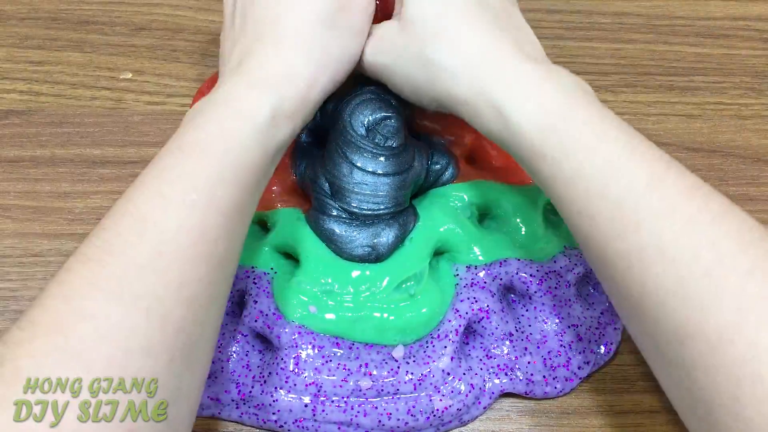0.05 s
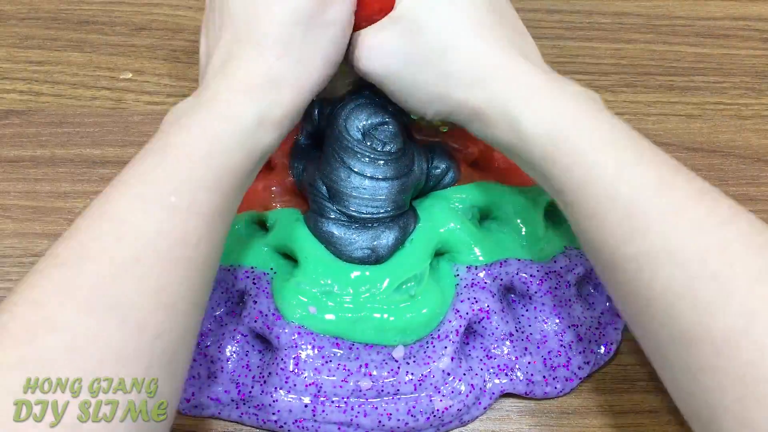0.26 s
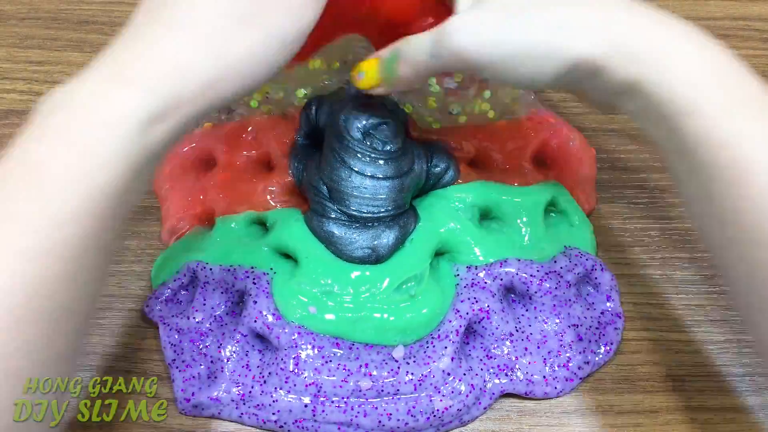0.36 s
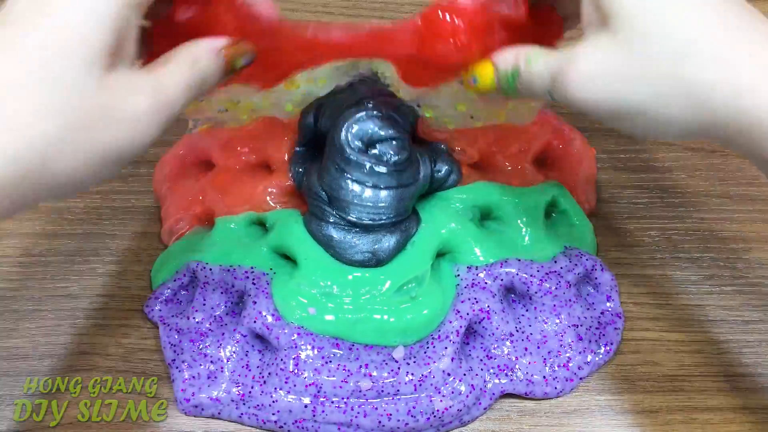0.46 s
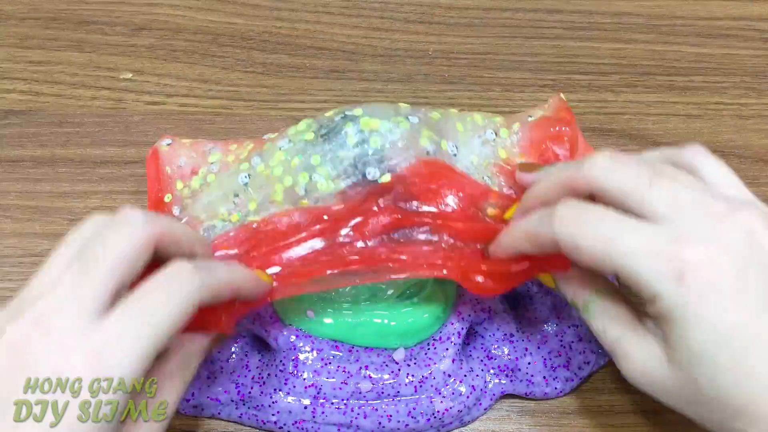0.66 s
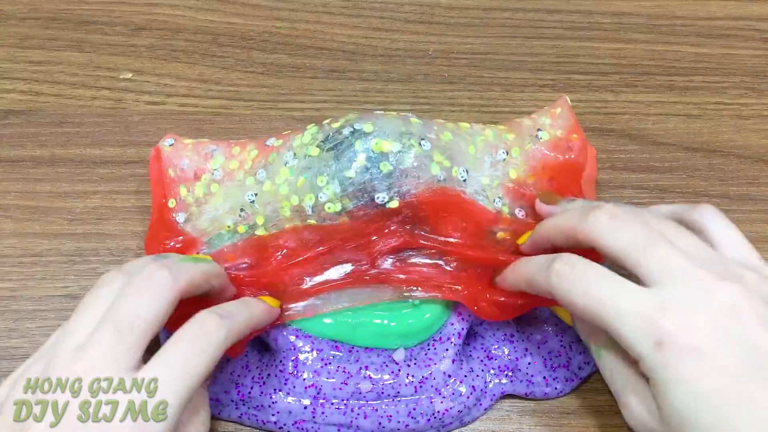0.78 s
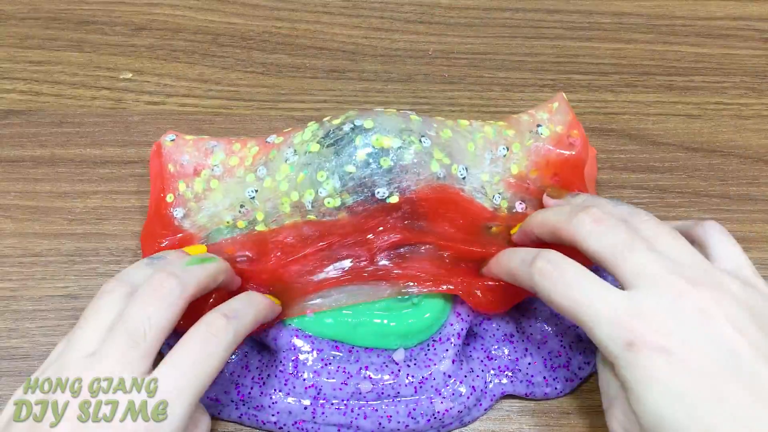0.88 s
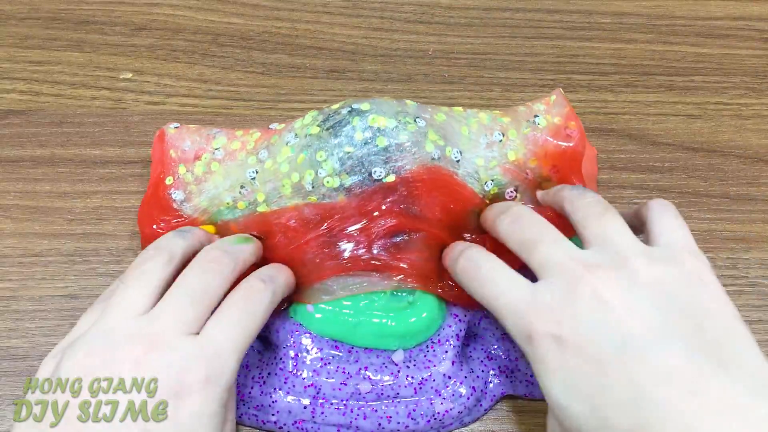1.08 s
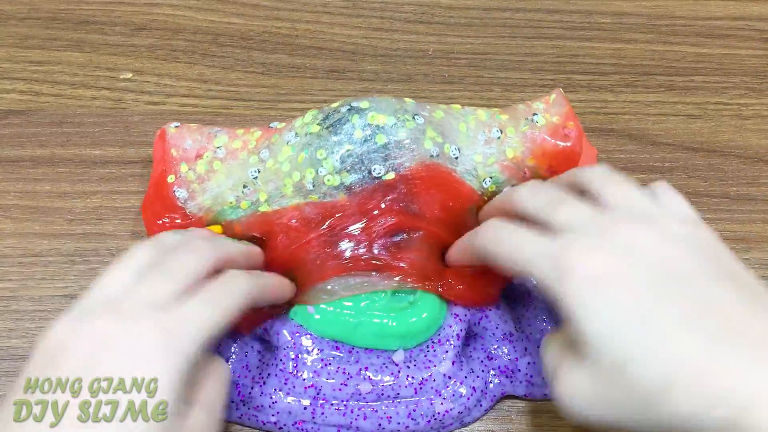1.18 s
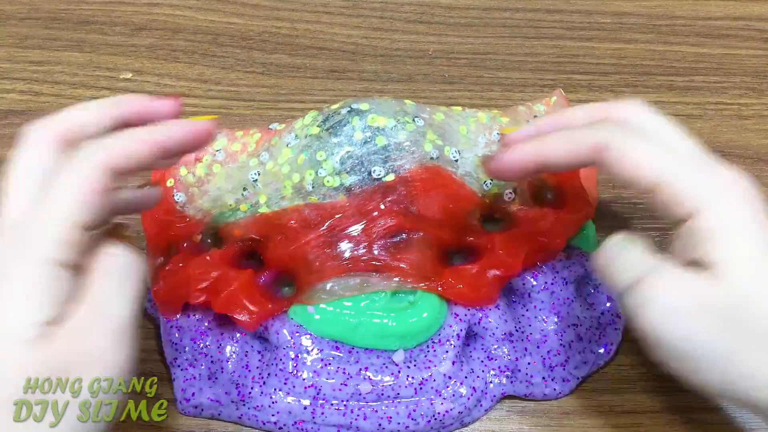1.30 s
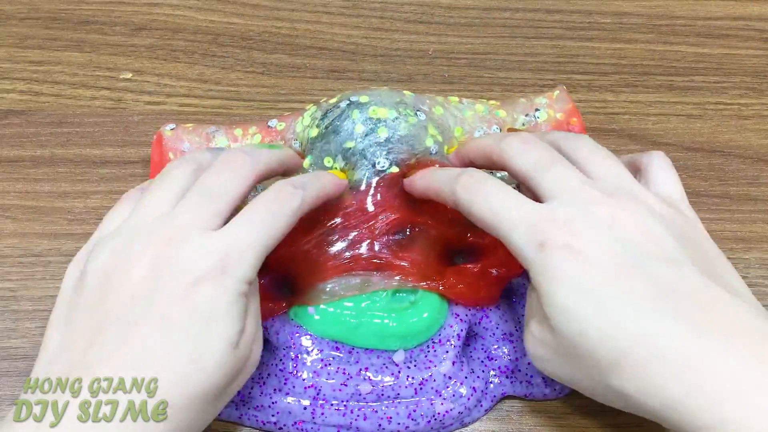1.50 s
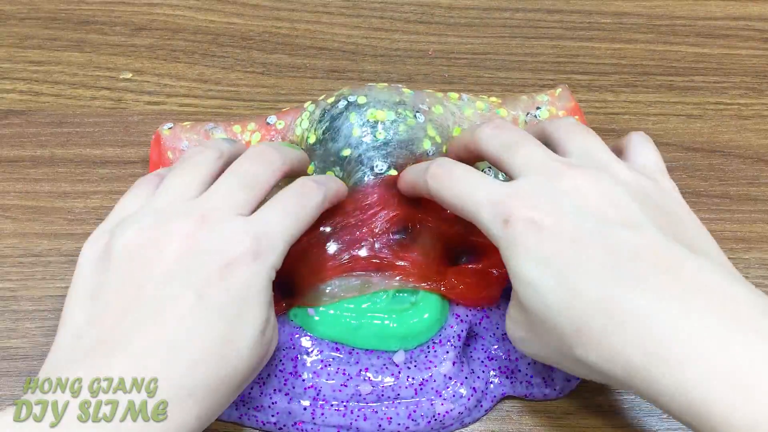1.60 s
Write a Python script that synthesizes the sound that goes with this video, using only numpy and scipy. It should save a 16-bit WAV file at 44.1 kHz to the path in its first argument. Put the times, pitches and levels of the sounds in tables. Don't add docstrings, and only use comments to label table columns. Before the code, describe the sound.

Popping slime, heard very close in a bare, hard room. A fading ring and faint ticks open it; from 0.25 to 0.4 seconds a loud, dense flurry of bright snaps and fizzy spray erupts. Its ring decays over near quiet with faint ticks around 0.9. A small pop comes at 1.14, then a softer, wetter crackle at 1.35-1.4 with a dull press thud, gurgle and one late click near 1.5.

```python
import sys
import numpy as np
from scipy import signal
from scipy.fft import rfft, irfft, next_fast_len
from scipy.io import wavfile
from scipy.ndimage import map_coordinates

SR = 44100
rng = np.random.default_rng(int(sys.argv[2]) if len(sys.argv) > 2 else 0)


def field_ratio(decibels):
    return 10 ** (np.asarray(decibels, dtype=float) / 20)


def dump(signal):
    limited = np.clip(np.atleast_2d(signal).T, -1, 1)
    pcm = np.round(limited * 32767).astype(np.int16)
    wavfile.write(sys.argv[1], SR, pcm)


N = 72765


def burst(t, hz, cycles):
    u = t * hz / np.clip(cycles, .1, 4)
    swell = u * np.exp(1 - u)
    return swell * np.sin(2 * np.pi * hz * t)


def pops(rows):
    lead = SR // 2
    snap_db, faint_db = -40, -33
    cupped_from_s = 1.27
    out = np.zeros(lead + N + 3 * SR)
    for s, db, hz, cycles in rows:
        start = int(s * SR // 1)
        length = int(12 * SR * max(cycles, .1) / hz) + 16
        t = np.maximum(np.arange(length) / SR - (s - start / SR), 0)
        snap = field_ratio(snap_db) * burst(t, hz * 1.6, 0.9)
        bubble = field_ratio(db) * (burst(t, hz, cycles) + snap)
        wet = heard(bubble, s > cupped_from_s, db < faint_db)
        out[lead + start:][:len(wet)] += wet
    return out[lead:lead + N]


def large_bubbles():
    bubble_pops = [(-.25, -18, 2210, 0.45), (.1095, -47, 7100, 1.9), (.132, -52, 5370, 1.1),
                   (.163, -55, 1900, 0.96), (.2382, -60, 2180, 1), (.24, -50, 10000, 0.58),
                   (.2451, -16, 4770, 1.12), (.2472, -24, 5000, 0.87), (.2475, -4.5, 8500, 0.26),
                   (.2478, -41.5, 800, 0.72), (.2618, -15, 9400, 0.35), (.2843, -24, 12300, .5),
                   (.2858, -10.5, 7900, 0.6), (.286, -24, 2100, 1.07), (.2934, -27, 7500, 0.34),
                   (.3008, -16, 6400, 0.58), (.3009, -23, 2430, 0.82), (.3076, -23, 2190, 0.86),
                   (.3145, -15.5, 13000, 2.1), (.3168, -32.5, 9500, 0.65), (.3225, -18, 8040, 0.31),
                   (.3256, -22, 11700, 1.4), (.3275, -16.5, 11800, 2.2), (.336, -21.5, 8360, 1.3),
                   (.3362, -24.5, 3870, 0.63), (.3396, -14.5, 8100, 1.9), (.3401, -18.5, 1960, 0.4),
                   (.3417, -14, 4100, 0.46), (.3448, -16, 12170, 0.59), (.3581, -32, 1880, 0.32),
                   (.348, -20, 8500, 0.55), (.3644, -21, 4160, 0.59), (.3706, -23, 11800, 0.75),
                   (.3886, -31, 7500, 0.52),
                   (.5, -43, 325, 0.81), (0.609, -43, 1000, 0.44), (0.8601, -45.5, 6000, 0.54),
                  (0.9064, -47.5, 6500, 0.45), (.861, -59, 2005, 0.56), (0.922, -49, 12570, 0.88),
                  (0.943, -51.5, 4480, 0.67), (1.1354, -25.5, 5360, 0.34), (1.1353, -28, 9600, 0.94),
                  (1.136, -38, 2310, 0.51), (1.285, -54, 783, 1.4), (1.284, -50, 1600, 0.46),
                  (1.2878, -44.5, 1840, 0.77), (1.3247, -45, 10200, 0.46), (1.3365, -50, 8650, 0.97),
                  (1.345, -42, 12500, 1.1), (1.353, -26.5, 12200, 1.1), (1.354, -27, 14600, 1.3),
                  (1.353, -28.5, 4900, 0.38), (1.357, -33.5, 5050, 1.9), (1.3638, -27.5, 7850, 1.5),
                  (1.3675, -28, 2820, 0.35), (1.372, -28, 4460, 1.4), (1.3733, -21, 12300, 1.4),
                  (1.3772, -19, 7550, 0.71), (1.3782, -24, 13000, 0.76), (1.3789, -26, 11600, 0.82),
                  (1.3792, -22.5, 785, 0.306), (1.5049, -24, 6070, 0.14), (1.5062, -52, 2200, 0.5),
                  (1.617, -34, 14600, 0.16), (1.6167, -43.5, 2210, 0.35),
                   (-.3, -16, 6000, .2), (-.28, -26, 766, .4), (-.1, -19.5, 9000, 0.36),
                  (-.06, -33.5, 4620, 0.79), (1.3805, -24, 1050, 0.18), (1.387, -33, 640, 0.27),
                  (1.3912, -41, 1270, 0.4), (1.3966, -44, 600, 0.66), (.9148, -66, 11500, 1),
                  (.9197, -62, 13300, 0.91), (.929, -52, 13500, 0.83), (0.9385, -53, 4700, 0.37),
                  (0.9058, -45.5, 13000, 0.48), (1.281, -56.5, 365, 3),
                   (.2514, -21, 9500, 1.1), (.2516, -24, 14500, .9), (.262, -22, 14000, .7),
                  (.2724, -19, 12500, .55), (.2874, -18, 8500, .5), (.2892, -22, 11500, .6),
                  (.3008, -3, 13000, .8), (.3025, -8.5, 12500, .9), (.3038, -18, 14000, .9),
                  (.3081, -13, 13500, .7), (.358, -13.5, 7500, .55), (.3641, -13, 8200, .8),
                  (1.3669, -21, 9000, .5), (1.3716, -26, 14000, 1.3), (1.3722, -20, 8500, .9),
                  (1.379, -10, 4200, .42), (1.3792, -26, 9000, .5), (1.3813, -27, 3300, .6),
                   (.2618, -34.5, 2200, 0.6), (.2668, -38, 2100, .8), (.2722, -38.5, 2200, .7),
                 (.2932, -35.5, 2400, 0.72), (.2518, -31.5, 4500, .7), (.108, -58, 14000, 1.21),
                 (.1635, -55, 6500, .3), (0.1, -58, 2500, .9), (.8605, -53, 11000, .5),
                 (0.61, -60, 2000, 0.46), (1.3875, -34, 5500, .5)]
    return pops(bubble_pops)


def spray(rows, centre_hz, octaves):
    count, per_s = 4000, 12000
    size_spread_db, cycles = 3.2, .7
    s, db = np.transpose(rows)
    r = rng.random((count, 2))
    when = s[0] + np.arange(count) / per_s + r[:, 0] * .004
    size_db = np.interp(when, s, db, -120, -120) - size_spread_db * np.log(r[:, 1] + .02)
    size = field_ratio(size_db) / 4
    hz = np.clip(centre_hz * 2 ** (octaves * rng.standard_normal(count)), 500, 16000)[:, None]
    k = np.arange(192)
    grains = size[:, None] * burst(k / SR, hz, cycles) * (hz / centre_hz) ** .5
    at = (when * SR).astype(int)[:, None] + k
    dry = np.bincount(at.ravel(), grains.ravel(), 2 * N)[:N]
    return dry + signal.fftconvolve(dry, room())[:N]


def tiny_bubbles():
    # t/s, level/dB
    tear_levels = [
        (.298, -74),
        (.306, -48),
        (.313, -16),
        (0.346, -18.5),
        (0.366, -15.5),
        (.39, -38.5),
        (.5, -34),
        (.6, -95),
    ]
    press_levels = [
        (1.34, -59),
        (1.352, -49),
        (1.356, -37.5),
        (1.368, -38),
        (1.382, -33),
        (1.395, -38.5),
        (1.46, -93),
    ]
    ooze_levels = [
        (1.378, -74),
        (1.386, -49),
        (1.42, -48.5),
        (1.45, -53.5),
        (1.54, -67.5),
        (1.64, -86),
    ]
    fizz_levels = [
        (.91, -82),
        (.922, -68),
        (.94, -58),
        (.95, -92),
    ]
    tear_and_press = spray(tear_levels, 12000, .5) + spray(press_levels, 3890, 1.21)
    return tear_and_press + spray(ooze_levels, 917, 0.32) + spray(fizz_levels, 7500, 0.9)


def table():
    scatter_db, t60_s, echoes_per_s = -13, 0.012, 9700
    bounce_s, bounce_db = 0.0014, -15.5
    t = np.arange(256) / SR
    echoes = np.clip(rng.standard_normal(len(t)), -2, 2)
    echoes = echoes * (rng.random(len(t)) < echoes_per_s / SR) * (t > 3e-4)
    near = field_ratio(scatter_db - 60 * t / t60_s) * echoes
    near[0] = 1
    near[round(bounce_s * SR)] += field_ratio(bounce_db)
    return near


def room(length=SR):
    # f/Hz, T60/s
    ring_times = [(200, 0.29), (600, 0.9), (1500, 0.94), (4000, 0.78), (9000, 0.76), (15000, 0.39)]
    # f/Hz, level/dB
    tail_tone = [(100, -25.5), (700, -0.5), (3000, -0.25), (9000, -3.5), (15000, 1.5)]
    wall_s, wall_db, build_s, room_db = .0076, -23, 0.0013, -2
    hz, t, z = signal.stft(rng.standard_normal(length), SR, nperseg=256)
    decay = field_ratio(-60 * t / along(ring_times, hz)[:, None])
    tail = signal.istft(z * decay, SR, nperseg=256)[1]
    tail = tail / np.linalg.norm(tail) * field_ratio(room_db)
    tail = tail * (1 - np.exp(-np.arange(len(tail)) / SR / build_s))
    tail[:40] += field_ratio(wall_db) * rng.standard_normal(40) * np.exp(-np.arange(40) / 15) / 3
    delayed = np.pad(tail, (round(wall_s * SR), 0))
    return filtered(delayed, lambda f: field_ratio(along(tail_tone, f)))


def heard(dry, cupped, faint):
    close = signal.fftconvolve(dry, table())
    room_db, dull_hz = (-6.5, 2970) if cupped else (0.5, 9000)
    tail = filtered(room(SR // 2 if faint else SR), lambda f: field_ratio(room_db) / np.sqrt(1 + (f / dull_hz) ** 2))
    wet = signal.fftconvolve(dry, tail)
    wet[:len(close)] += close
    return wet


def squelch():
    # t/s, level/dB
    squelch_levels = [
        (0.0, -63),
        (0.206, -70.5),
        (0.288, -54),
        (0.518, -54),
        (0.532, -55),
        (0.822, -72),
        (1.332, -70.5),
        (1.374, -44),
        (1.65, -70.5),
    ]
    # f/Hz, level/dB
    squelch_tone = [(60, -100), (120, -36), (260, -13), (400, -7), (700, -19), (1500, -100)]
    return hush(squelch_tone) * field_ratio(level(squelch_levels) - 5 + 2 * wobble(30))


def air():
    # f/Hz, level/dB per Hz
    air_tone = [(88, -33), (150, -8.5), (431, -11.5), (601, -22.5), (730, -14.5), (3700, -24.5),
                (4950, -24), (16000, -26.5)]
    # t/s, level/dB
    handling_levels = [
        (0.0, -68.5),
        (0.44, -67),
        (0.51, -61.5),
        (0.574, -75),
        (1.216, -66),
        (1.258, -77),
        (1.396, -52.5),
        (1.502, -69.5),
        (1.65, -61),
    ]
    # f/Hz, level/dB
    rumble_tone = [(25, -48), (45, -1.5), (62, 4.5), (90, -2.5), (130, -2), (200, -12), (400, -31),
                   (900, -100)]
    rumble_db = level(handling_levels) + 2.5 * wobble(6.6)
    return field_ratio(-69) * hush(air_tone) + hush(rumble_tone) * field_ratio(rumble_db)


def hush(tone):
    return unit(filtered(rng.standard_normal(N), lambda f: field_ratio(along(tone, f))))


def level(rows):
    return np.interp(np.arange(N) / SR, *np.transpose(rows))


def wobble(rate):
    return map_coordinates(rng.standard_normal(N // 100), [np.arange(N) * rate / SR])


def unit(x):
    return x / np.sqrt(np.mean(x ** 2) + 1e-20)


def along(points, hz):
    f, v = np.transpose(points)
    return np.interp(np.log(hz + 1), np.log(f + 1), v)


def filtered(x, response):
    m = next_fast_len(len(x) + 8192)
    return irfft(rfft(x, m) * response(np.fft.rfftfreq(m, 1 / SR)), m)[:len(x)]


def scene():
    thin_below_hz = 260
    bubbles = large_bubbles() + tiny_bubbles()
    slime = filtered(bubbles, lambda f: f ** 2 / (f ** 2 + thin_below_hz ** 2))
    return (slime + squelch() + air())[None]


def low_pass(x):
    return signal.sosfilt(signal.butter(12, 16970, fs=SR, output="sos"), x)


def record(dry):
    bass_cut_hz, top_hz, edge_hz, above_db = 41.3, 15850, 70, -40

    def band(f):
        shelf = field_ratio(above_db * (1 + np.tanh((f - top_hz) / edge_hz)) / 2)
        return shelf * f ** 4 / (f ** 4 + bass_cut_hz ** 4)

    mix = filtered(dry[0], band)[None]
    return low_pass(mix)


dry = scene()
out = record(dry)
dump(out)
```